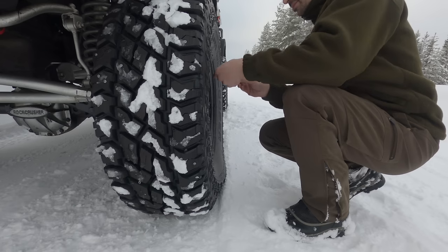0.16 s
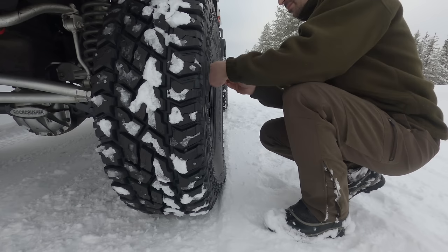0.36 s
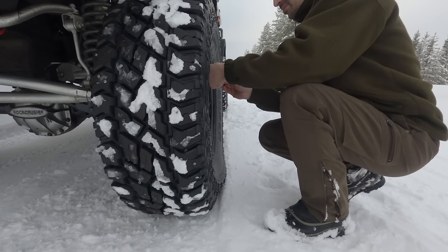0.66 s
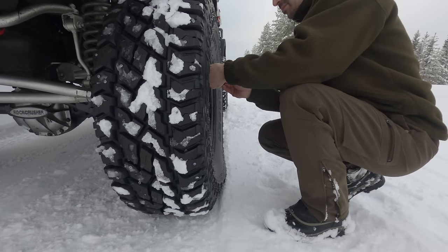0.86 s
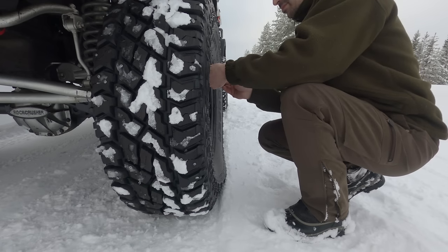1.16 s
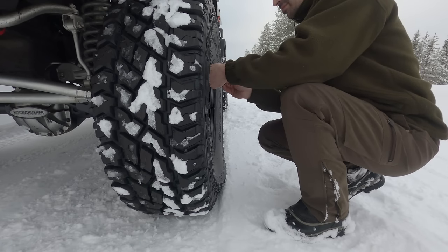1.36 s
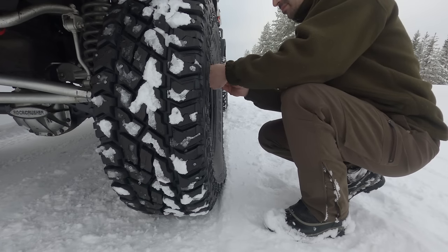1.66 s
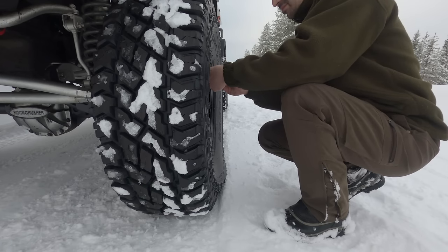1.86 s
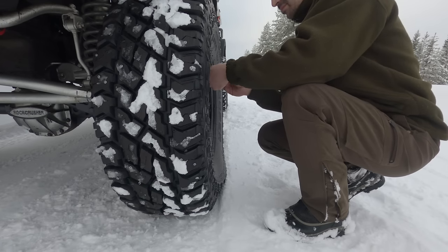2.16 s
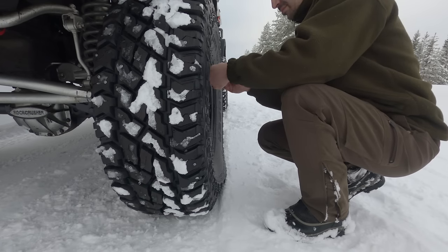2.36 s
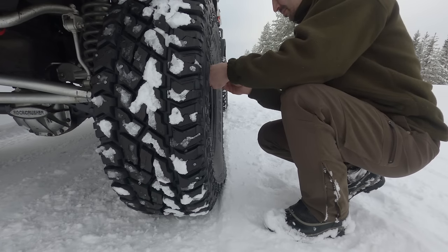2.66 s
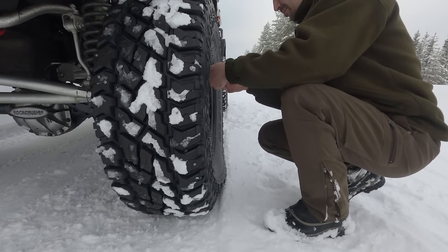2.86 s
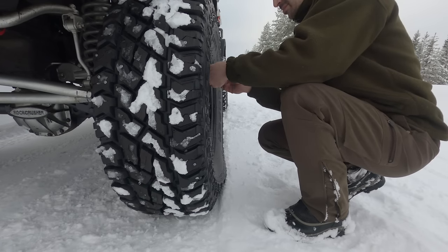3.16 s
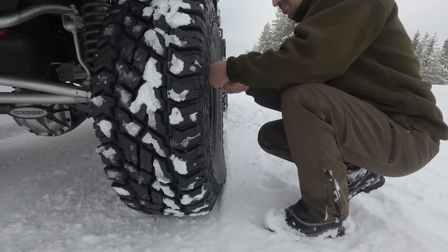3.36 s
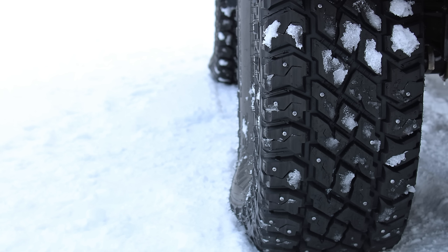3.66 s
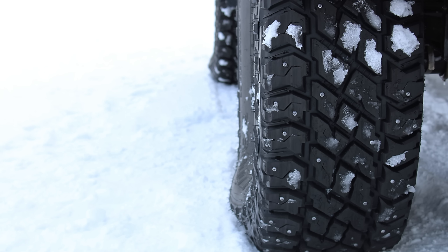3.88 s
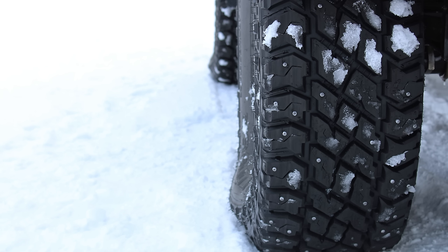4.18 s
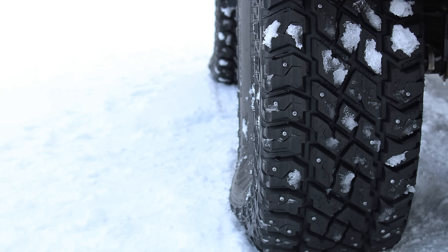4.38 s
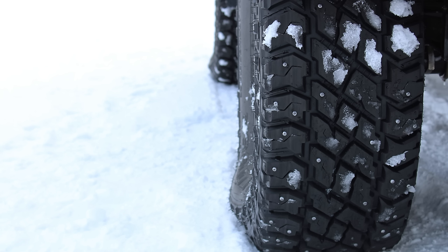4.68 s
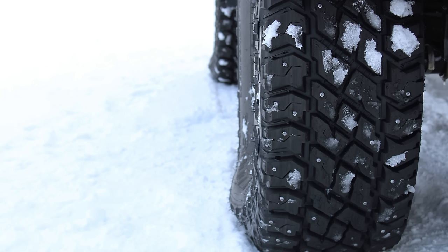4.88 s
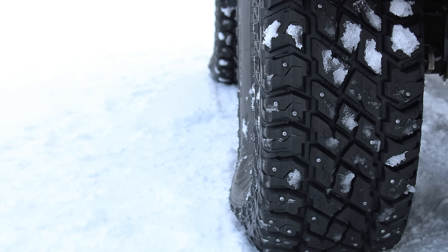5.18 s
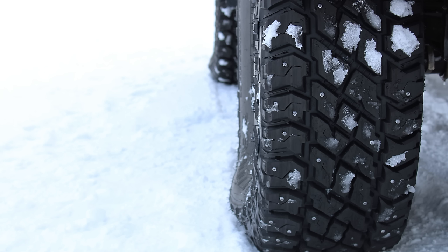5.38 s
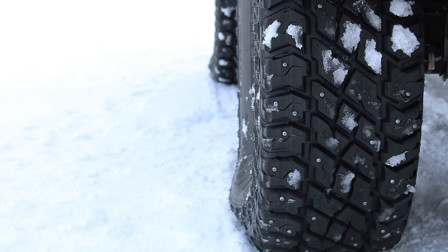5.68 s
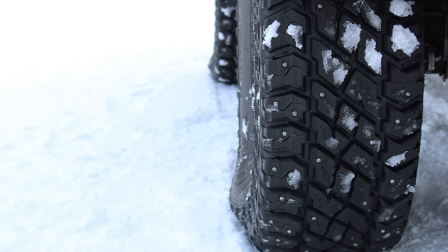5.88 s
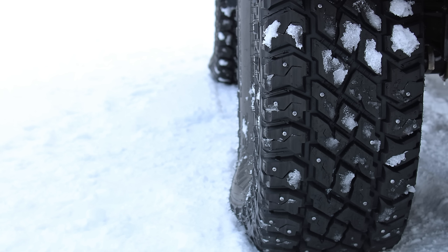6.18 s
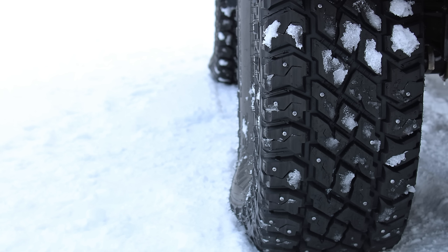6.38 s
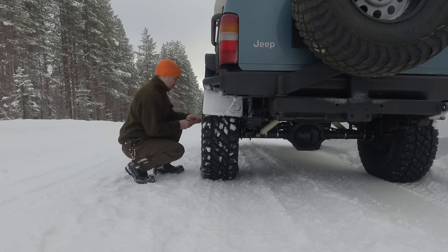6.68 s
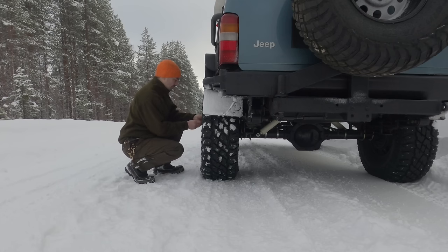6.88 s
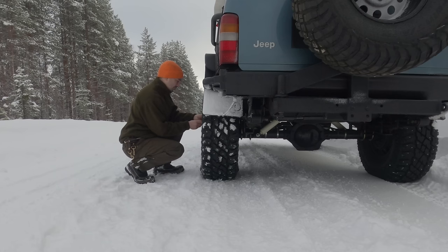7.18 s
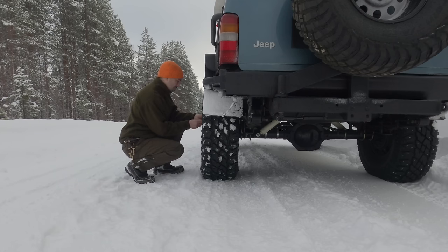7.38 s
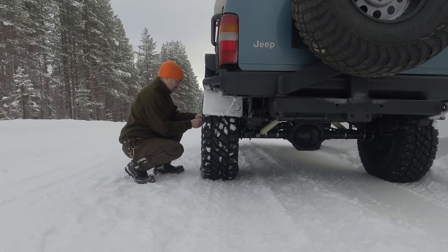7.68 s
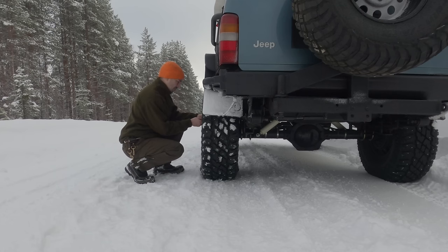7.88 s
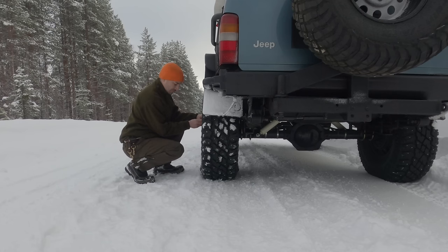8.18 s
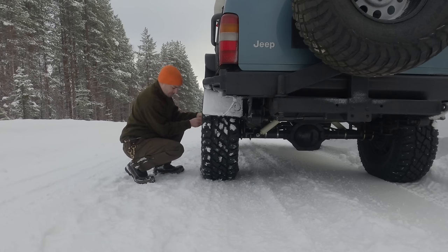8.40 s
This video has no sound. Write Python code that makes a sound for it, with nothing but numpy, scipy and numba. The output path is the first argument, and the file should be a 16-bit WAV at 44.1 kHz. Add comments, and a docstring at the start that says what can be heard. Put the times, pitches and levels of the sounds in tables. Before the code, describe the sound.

Close outdoor sound of air being let out of two large tyres. A strong, bright, breathy hiss starts at once, its hollow tone shifting as a hand moves round the valve, and cuts off before two seconds. Tiny metallic clicks and low wind fill the gap. A quieter, steadier hiss then swells in, with dull bumps on the microphone, and stops just before eight seconds, leaving faint background hiss.

```python
"""On a snowy track, air is let out of two big tyres, one after the other.
Each brass valve gives a jet of turbulent noise; a cupped hand adds a hollow resonance that glides in pitch.
Fingers click the valve parts as decaying modes, and soft bumps ring the microphone body.
Wind rumbles as low lumpy noise, and one stem whistles faintly as it opens.
The background hiss is coloured noise: a faint leak at first, later steady microphone self-noise."""
import sys
import numpy as np
from scipy import signal
from scipy.fft import rfft, irfft, next_fast_len
from scipy.io import wavfile
from scipy.ndimage import uniform_filter1d
from numba import njit

SR = 44100
rng = np.random.default_rng(int(sys.argv[2]) if len(sys.argv) > 2 else 0)


def master(y):
    """Save y as 16-bit WAV."""
    cut = np.clip(np.atleast_2d(y).T, -1, 1)
    pcm = np.round(cut * 32767)  # scale
    wavfile.write(sys.argv[1], SR, pcm.astype(np.int16))


def gain_from_decibels(decibels):
    """Convert decibel values to linear amplitude factors."""
    exponent = np.asarray(decibels, float) / 20
    return 10 ** exponent


N = 376613
HZ = np.fft.rfftfreq(next_fast_len(N, True), 1 / SR) + 1   # raised 1 Hz to keep the logarithm finite

# Jet of each valve: t/s, hiss level/dB, brightness/(dB per octave), lift of the top bands/dB
JET_COURSES = [
    [(0.0, -20, 1, -2), (0.28, -19, 0, -2.5), (0.6, -22.5, -0.5, -5), (0.71, -18, 0, -6),
     (1.05, -19.5, 0, -5), (1.38, -19.5, 0, -3), (1.5, -22, -2.5, -1.5), (1.62, -17.5, -1, -4.5),
     (1.67, -28, -3, 7), (1.714, -55, 0, -5), (1.76, -58, 7, -5)],
    [(3.15, -66, 4, 0), (3.22, -45.5, 1, -1), (3.3, -40, 1, 2), (3.56, -31.5, 0.5, 3), (4.1, -27.5, 1, 1),
     (4.25, -28, 0.5, 1), (5.72, -28, 0.5, -1), (7.1, -28, 0.9, -0.5), (7.54, -27.5, 0, 0),
     (7.58, -26.5, 1, 2), (7.66, -32, -1, 8), (7.71, -33.5, -2.5, 4), (7.78, -33.5, -3.5, 7),
     (7.83, -54.5, -2.5, 0), (7.9, -63, 4, 0)],
]
# Hand moving round each valve: start t/s, length/s, drive level/dB, from f/Hz, to f/Hz
HAND_MOVES = [
    [(.265, .3, -18, 490, 3600), (.66, 0.32, -25.5, 3000, 3870), (1.05, 0.36, -24, 1900, 2730),
     (1.61, 0.023, -26.5, 2200, 400)],
    [(6.80, 0.74, -25.5, 227, 2360), (7.62, 0.18, -41.5, 2300, 500)],
]
# Relative spectrum of each jet: f/Hz, level per Hz/dB
JET_COLOURS = [
    [(60, -42), (100, -17.5), (500, -17), (800, -18), (1500, -10), (2500, -7.5), (3800, -4), (6500, -9.5),
     (9000, -10), (12000, -5.5), (15700, -7.5)],
    [(40, -51), (70, -20), (200, -19.5), (650, -16.5), (1400, -7), (1900, -9), (2400, -4.5), (3200, -4.5),
     (4100, -2.5), (5500, -6.5), (7000, -7), (9500, -6), (11000, -10), (13500, -8), (15700, -9.5)],
]
# Valve stem and rim resonances: f/Hz, width/Hz, lift/dB
STEM_RESONANCES = [
    [(1626, 45, 7), (3600, 750, 3.5), (4100, 290, 5.5), (5000, 280, 2.5), (5700, 270, 2), (6760, 160, 3.5),
     (8870, 410, 5), (9870, 300, 3.5)],
    [(2210, 200, 8.5), (2670, 210, 2.5), (3950, 420, 3), (4170, 140, 2.5), (4980, 390, 6.5), (5950, 140, 8),
     (6350, 230, 4.5), (7650, 130, 2), (8800, 550, 0.5)],
]
# Reflections off rim, wheel arch and snow, per valve: delay/ms, level/dB
REFLECTIONS = [
    [(1.39, -33), (1.99, -27), (2.14, -52), (2.31, -37), (3.13, -19), (4.0, -24)],
    [(.53, -23), (.74, -16.5), (.94, -27), (1.3, -38), (1.62, -34), (2.86, -62), (4.2, -38)],
]
# Low rustle of blown air buffeting hand and tool, per valve: t/s, level/dB
BUFFET_LEVELS = [
    [(0.0, -44), (0.2, -54), (0.356, -50.5), (1.46, -51), (1.76, -65)],
    [(3.7, -66), (4.12, -67), (4.4, -49.5), (5.05, -56.5), (5.29, -63), (6.5, -59), (6.99, -48.5),
     (7.68, -47), (7.9, -80)],
]
# Relative spectrum of that rustle: f/Hz, level per Hz/dB
BUFFET_SPECTRUM = [(50, -33), (100, -11.5), (200, 2.5), (350, -3), (600, -2), (1200, -21.5)]
# Weak side noise under mid, before its flicker: f/Hz, level/dB
SIDE_UNDER_MID = [(60, -14), (300, -18), (1000, -18), (3000, -30), (6000, -23), (15000, -18.5)]
# Background hiss, a faint leak and then microphone self-noise: t/s, level/dB, brightness/(dB per octave)
HISS_COURSES = [
    [(0, -53, 4), (1.7, -52, 2), (2.55, -53, .5), (3.4, -54.5, 0), (4, -80, -1)],
    [(3.1, -75, 2), (3.6, -59, 0), (7.8, -57, 0), (8.54, -58, .5)],
]
# Relative spectrum of each background hiss: f/Hz, level per Hz/dB
HISS_SPECTRA = [
    [(88, -34), (150, 2.5), (239, -4.5), (671, -9.5), (1610, -10.5), (2890, -12.5), (4350, -7.5),
     (7350, -12.5), (10000, -14.5), (15700, -22)],
    [(35, -37), (60, -4.5), (286, -2), (321, -4.5), (477, -9), (1240, -9), (3150, -13), (4070, -9.5),
     (4460, -10), (15700, -20.5)],
]
# Narrow humps in each background hiss: f/Hz, width/Hz, lift/dB
HISS_RESONANCES = [
    [(5660, 150, 6), (6700, 110, 8), (10160, 200, 6.5)],
    [(2200, 200, 0), (4080, 250, 3.5), (10400, 200, 6)],
]
# Wind on the microphone between the swells, dying down: t/s, level/dB
WIND_LULL = [(0, -48), (1.5, -50), (3.2, -57), (4.0, -71), (5.2, -70), (8.54, -84)]
# Low swells, wind gusts except the last, the low thump of a bump: start t/s, length/s, level/dB
LOW_SWELLS = [(.08, 0.2, -39), (.44, 0.1, -38.5), (0.756, 0.027, -44), (0.895, 0.018, -43.5),
              (1.024, .33, -42.5), (1.685, 0.018, -46), (1.856, 0.046, -40), (2.04, 0.045, -43.5),
              (2.355, 0.16, -45.5), (2.8, .03, -51.5), (2.993, 0.1, -47.5), (3.353, .03, -53),
              (3.535, 0.045, -45.5), (3.847, .02, -56), (7.6, 0.028, -63)]
# Relative spectrum of the wind and low swells: f/Hz, level per Hz/dB
RUMBLE_SPECTRUM = [(12, -28), (25, 3.5), (65, 4.5), (127, -8), (232, -28), (284, -44), (343, -64),
                   (500, -27), (650, -54), (1100, -120)]
# Finger clicks on the valve: t/s, peak level/dB, main ring f/Hz
FINGER_CLICKS = [(1.923, -33.5, 3820), (1.9344, -39, 3770), (2.0287, -31, 4400), (2.1694, -37, 6100),
                 (2.1884, -43, 4190), (2.2338, -30, 2190), (2.277, -38, 6010), (2.4767, -34.5, 3250),
                 (2.6594, -34, 3280), (2.667, -43, 3850), (2.6748, -28, 4790), (2.814, -39, 3910),
                 (2.868, -41, 5200), (3.0794, -40, 6400), (3.087, -36, 5300), (3.103, -43, 4290),
                 (3.243, -33, 3940), (8.1219, -44, 4050)]
# Modes of the small metal part that clicks: f/Hz, relative level/dB, t60/s
PART_MODES = [(1000, -8, .006), (2080, -7, .009), (3350, 3, 0.008), (4700, -1, 0.02), (6100, -7, 0.011),
              (8300, -32, 0.0066)]
# Soft bumps: t/s, peak level/dB, nominal f/Hz, t60/s, hardness/dB
SOFT_BUMPS = [(2.015, -37.5, 700, 0.023, -7), (3.834, -34, 427, 0.096, -3), (4.29, -37, 127, 0.087, -5),
              (4.362, -14, 293, 0.047, 1), (4.393, -23, 218, 0.033, -10), (4.492, -37, 332, 0.069, 5),
              (4.519, -37, 422, 0.05, -1), (4.612, -34, 332, 0.065, -3), (4.645, -33, 343, 0.046, -6),
              (4.767, -25, 206, 0.028, -9), (4.822, -24, 164, 0.037, -15), (4.879, -29, 180, 0.03, -11),
              (4.979, -32, 150, 0.064, 9), (5.099, -32.5, 275, 0.045, -3), (5.147, -37, 126, 0.044, 0),
              (5.542, -25, 238, 0.046, 2.5), (5.569, -32, 222, 0.04, 6), (5.589, -35, 239, 0.057, 1),
              (6.653, -38, 175, 0.05, -3), (6.851, -34, 216, 0.14, 3), (7.498, -32, 422, 0.095, -3),
              (7.579, -40, 205, 0.037, -5), (7.788, -31.5, 273, 0.05, 5)]
# Overtones of a bump: multiple of nominal f, level before hardness/dB
BUMP_MODES = [(1.63, -10.5), (2.6, -16.5), (3.8, -23)]
# Whistle of the second stem while barely open: t/s, level/dB
WHISTLE_LEVELS = [(3.12, -76), (3.2, -60), (3.7, -44.5), (4.0, -45), (4.3, -65)]

GLIDE_S, GLIDE_SHARE = 0.075, 0.065   # a longer move glides more slowly
CUP_ATTACK_S, CUP_SAG_DB_PER_S, CUP_RELEASE_DB_PER_S = 0.052, 11, 266
SWELL_RISE_DB_PER_S, SWELL_FALL_DB_PER_S = 200, 120
CLICK_T60_S = 0.011
THUD_HZ, THUD_T60_S, THUD_DB = 45, 0.095, -31   # level before hardness
WHISTLE_HZ, WHISTLE_WIDTH_HZ = 2230, 110
SIDE_ON_THRESHOLD, SIDE_OFF_DB = 0.25, -25   # threshold in units of the drift's spread
CUTOFF_HZ = 15800


def rms_one(x):
    """Normalisation: scales a signal to unit root mean square."""
    return x / np.sqrt(np.mean(x ** 2) + 1e-20)


def to_hz(x):
    """Fourier analysis: a signal as its spectrum."""
    return rfft(x, next_fast_len(N, True))


def to_time(spectrum):
    """Fourier synthesis: a spectrum as its signal."""
    return irfft(spectrum.astype(np.complex64), next_fast_len(N, True))[..., :N]


def in_time(rows):
    """Linear interpolation: columns as curves; the first, a level, is silent outside the table."""
    s, level_db, *others = np.transpose(rows)
    t = np.arange(N) / SR
    return [np.interp(t, s, level_db, -200, -200)] + [np.interp(t, s, column) for column in others]


def at_hz(points, hz):
    """Logarithmic frequency scale: interpolates levels along it."""
    f, db = np.transpose(points)
    return np.interp(np.log(hz), np.log(f), db)


def drift(rate):
    """Low-passed noise: slow chance variation of spread 1, with its two poles at rate Hz."""
    r = np.exp(-128 * np.pi * rate / SR)   # one value per 64 samples
    chance = rng.standard_normal(N // 64 + 1002)
    slow = signal.lfilter([1], [1, -2 * r, r * r], chance)[1000:]
    return np.interp(np.arange(N) / 64, np.arange(len(slow)), rms_one(slow - slow.mean()))


def colour(spectrum, resonances=()):
    """Resonance: gain per frequency as a smooth slope with humps on it."""
    db = at_hz(spectrum, HZ)
    for hz, width_hz, lift_db in resonances:
        db = db + lift_db / (1 + (2 * (HZ - hz) / width_hz) ** 2)
    return gain_from_decibels(db)


def mid_side_noise():
    """White noise: spectra of a mid signal and of weak independent side noise."""
    white = to_hz(rng.standard_normal((2, N)))
    white[1] *= colour(SIDE_UNDER_MID)
    return white


def airy(gain, flutter_db, patchy_db, tilt_db=0, shade_db=0):
    """Band modulation: noise in overlapping bands that flutter together and each on its own; mid and side."""
    white = mid_side_noise()
    together = flutter_db * (drift(10.7) + 0.71 * drift(36.0))
    half_octaves = np.clip(np.log2(HZ / 4000) / .5, -8, 4)   # from 4 kHz
    scale = 1 / np.std(to_time(white[0] * gain))
    out = 0
    for k in range(-8, 5):
        window = np.cos(np.pi / 2 * np.clip(half_octaves - k, -1, 1)) ** 2
        band = to_time(white * gain * window)
        band_db = patchy_db * drift(5.4) + tilt_db * k * .5 + shade_db * (k >= 3)
        out = out + band * gain_from_decibels(together + band_db)
    return out * scale


def ring(excitation, hz, t60):
    """Damped oscillator: a unit impulse sets off a decaying sine of initial height about 1."""
    r, w = gain_from_decibels(-60 / (max(t60, .004) * SR)), 2 * np.pi * hz / SR
    return signal.lfilter([0, np.sin(w)], [1, -2 * r * np.cos(w), r * r], excitation)


@njit
def sliding_resonance(x, hz, q, sr):
    """State-variable filter: a band-pass whose centre moves sample by sample."""
    out = np.zeros_like(x)
    for c in range(x.shape[0]):
        a = b = 0.0
        for i in range(x.shape[1]):
            g = np.tan(np.pi * hz[i] / sr)
            band = (a + g * (x[c, i] - b)) / (1 + g * (g + 1 / q))
            low = b + g * band
            a, b = 2 * band - a, 2 * low - b
            out[c, i] = band / q
    return out


def reflected(x, echoes, scatter_db):
    """Comb interference: fixed short echoes, and weak ones off hands and tread that swell and fade."""
    def late(ms, gain):
        """Time shift: a delay is a phase that grows with frequency."""
        return gain * np.exp(-2j * np.pi * HZ * ms / 1000)

    spectrum = to_hz(x)
    out = to_time(spectrum * (1 + sum(late(ms, gain_from_decibels(db)) for ms, db in echoes)))
    for delays_ms in rng.uniform(0.3, 6.0, (3, 8)):
        scatter = sum(late(ms, gain_from_decibels(scatter_db)) for ms in delays_ms)
        out += drift(1.64) * to_time(spectrum * scatter)
    return out


def lumpy(rows, spectrum, lumps_db):
    """Amplitude modulation: coloured pressure noise comes in lumps, its side 20 dB under its mid."""
    pressure = to_time(to_hz(rng.standard_normal((2, N))) * colour(spectrum))
    level_db = in_time(rows)[0] + lumps_db * drift(9.2)
    return gain_from_decibels(level_db) * pressure / pressure.std() * gain_from_decibels([[0], [-20]])


def cupping(moves):
    """Cavity tuning: each hand move swells, sags and lets go as the hollow glides to its new pitch."""
    t = np.arange(N) / SR
    ring_db, hz = np.full(N, -200.), np.full(N, float(moves[0][3]))
    for start, length, db, from_hz, end_hz in moves:
        since = np.maximum(t - start, 0)
        swell = 40 * np.log10(1 - np.exp(-since / CUP_ATTACK_S) + 1e-6)
        sag = CUP_SAG_DB_PER_S * since
        release = CUP_RELEASE_DB_PER_S * np.maximum(since - length, 0)
        ring_db = np.maximum(ring_db, db + swell - sag - release)
        glide_s = GLIDE_S + GLIDE_SHARE * length
        remaining = np.exp(-(since / glide_s) ** 1.1)
        hz = np.where(t < start, hz, end_hz * (from_hz / end_hz) ** remaining)
    return ring_db, uniform_filter1d(hz, size=2000)


def jet(course, moves, spectrum, stem, echoes, buffet):
    """Jet noise and cavity resonance: free hiss, air ringing in the hollow hand, and low buffeting."""
    hiss_db, tilt_db, shade_db = in_time(course)
    free = airy(colour(spectrum, stem), flutter_db=0.1, patchy_db=1.01, tilt_db=tilt_db, shade_db=shade_db)
    ring_db, hz = cupping(moves)
    rush = to_time(mid_side_noise() * colour([(100, 0), (16000, 0.0081)], stem))
    hollow = sliding_resonance(sliding_resonance(rush, hz, 0.5, SR), hz, 0.48, SR)
    hollow *= gain_from_decibels(ring_db + 1.3 * drift(28.0))
    hollow *= np.sqrt(9000 / hz)   # a lower hollow passes less noise
    air = reflected(gain_from_decibels(hiss_db) * free + hollow, echoes, scatter_db=-23.5)
    return air + lumpy(buffet, BUFFET_SPECTRUM, lumps_db=3.0)


def background_hiss(course, spectrum, humps):
    """Coloured noise: a faint leak at first, later steady microphone self-noise."""
    level_db, tilt_db = in_time(course)
    return gain_from_decibels(level_db) * airy(colour(spectrum, humps), flutter_db=0.5, patchy_db=1.3, tilt_db=tilt_db)


def low_rumble():
    """Low pressure noise: wind gusts, and one bump's thump, rise out of the lull, hold and fall back."""
    t = np.arange(0, N / SR, .01)
    start, length, db = np.transpose(LOW_SWELLS)[..., None]
    rise = SWELL_RISE_DB_PER_S * np.maximum(start - t, 0)
    fall = SWELL_FALL_DB_PER_S * np.maximum(t - start - length, 0)
    swells_db = (db - rise - fall).max(axis=0)
    level_db = np.maximum(swells_db, np.interp(t, *np.transpose(WIND_LULL)))
    return lumpy(np.transpose([t, level_db]), RUMBLE_SPECTRUM, lumps_db=2.5)


def strikes(events, play, length_s):
    """Superposition: adds one short sound per row, scaled to its peak."""
    out = np.zeros(N + SR)
    for row, chance in zip(events, rng.standard_normal((len(events), int(length_s * SR)))):
        sound = play(chance, *row[2:])
        at = round(row[0] * SR)
        out[at:at + len(sound)] += gain_from_decibels(row[1]) * sound / np.abs(sound).max()
    return out[:N]


def click(chance, main_hz):
    """Modal excitation: a brief scratchy contact cracks broadly and rings the part and a main mode."""
    contact = chance * np.exp(-np.arange(len(chance)) / (0.0022 * SR))
    crack = signal.sosfilt(signal.butter(2, [600, 5500], "band", fs=SR, output="sos"), contact)
    part = sum(gain_from_decibels(db) * ring(contact, hz, decay) for hz, db, decay in PART_MODES)
    return gain_from_decibels(5.5) * ring(contact, main_hz, CLICK_T60_S) + part + gain_from_decibels(20.0) * crack


def bump(chance, hz, t60, hard_db):
    """Damped vibration: a soft push rings the body with a dull puff; hardness lifts overtones and thud."""
    t = np.arange(len(chance)) / SR
    impulse = (t == 0) + 0.
    turns = hz * (0.773 * t + 0.0053 * (1 - np.exp(-t / 0.011)))   # starts above where it settles
    body = np.sin(2 * np.pi * turns) * gain_from_decibels(-60 * t / t60)
    body += sum(gain_from_decibels(db + hard_db) * ring(impulse, k * hz, 0.8 * t60) for k, db in BUMP_MODES)
    body += gain_from_decibels(THUD_DB + hard_db) * ring(impulse, THUD_HZ, THUD_T60_S)   # the microphone rocks
    puff_band = signal.butter(2, [0.32 * hz, 1.7 * hz], "band", fs=SR, output="sos")
    puff = signal.sosfilt(puff_band, chance) * gain_from_decibels(-60 * t / (1.7 * t60))
    soft_onset = (1 - np.exp(-t / 0.0017)) ** 2
    return (body + gain_from_decibels(9.0) * puff) * soft_onset


def whistle():
    """Selective resonance: air noise narrowed by the stem to a whistle."""
    resonance = 1 / (1 + (2 * (HZ - WHISTLE_HZ) / WHISTLE_WIDTH_HZ) ** 2)
    tone = to_time(to_hz(rng.standard_normal(N)) * resonance)
    return gain_from_decibels(in_time(WHISTLE_LEVELS)[0]) * rms_one(tone)


def side_flicker():
    """Random gating: the weak side noise flickers on and nearly off, edges eased over 20 ms."""
    on = drift(3.0) > SIDE_ON_THRESHOLD
    return uniform_filter1d(np.maximum(on, gain_from_decibels(SIDE_OFF_DB)), size=900)


def scene():
    """Superposition: sums the sources as mid and side, then forms left and right."""
    valves = zip(JET_COURSES, HAND_MOVES, JET_COLOURS, STEM_RESONANCES, REFLECTIONS, BUFFET_LEVELS)
    air = sum(jet(*valve) for valve in valves)
    hiss = sum(background_hiss(*row) for row in zip(HISS_COURSES, HISS_SPECTRA, HISS_RESONANCES))
    knocks = strikes(FINGER_CLICKS, click, length_s=.06) + strikes(SOFT_BUMPS, bump, length_s=0.21)
    centred = (knocks + whistle()) * [[1], [0]]
    mid, side = air + hiss + low_rumble() + centred
    side = side * side_flicker()
    return np.array([mid + side, mid - side])


def band_limit(x):
    """A steep low-pass at the top of the band."""
    return signal.sosfilt(signal.butter(12, 16550, fs=SR, output="sos"), x)


def record(dry):
    """Band limitation: a steep elliptic low-pass removes the top."""
    low_pass = signal.ellip(10, .5, 60, CUTOFF_HZ, fs=SR, output="sos")
    finished = signal.sosfilt(low_pass, dry)
    return band_limit(finished)


dry = scene()
out = record(dry)
master(out)
```